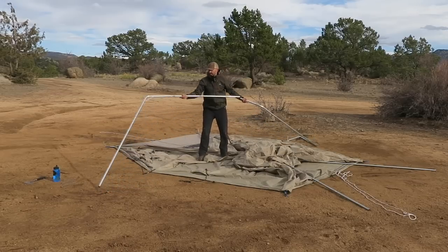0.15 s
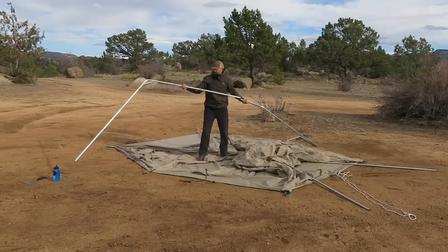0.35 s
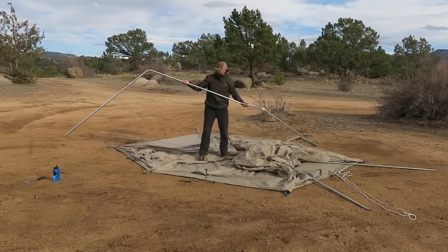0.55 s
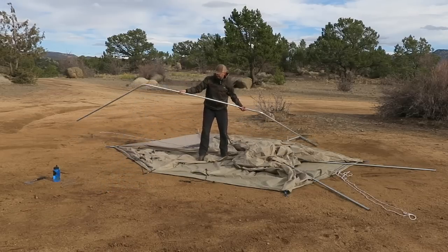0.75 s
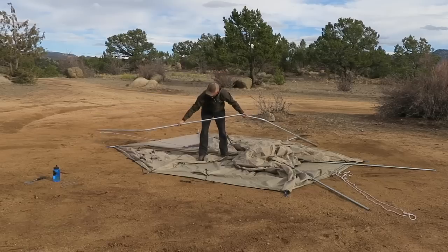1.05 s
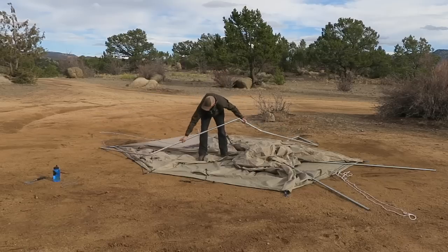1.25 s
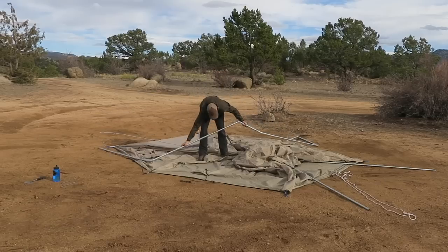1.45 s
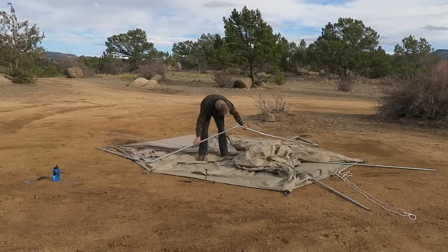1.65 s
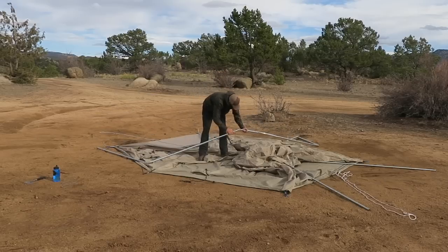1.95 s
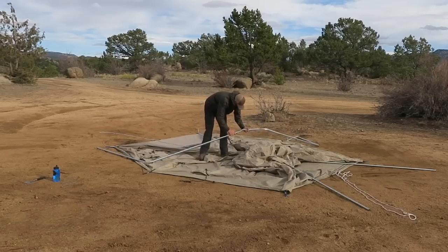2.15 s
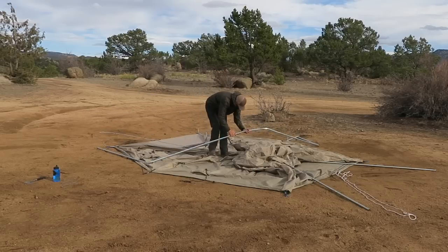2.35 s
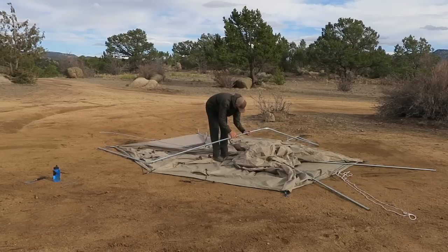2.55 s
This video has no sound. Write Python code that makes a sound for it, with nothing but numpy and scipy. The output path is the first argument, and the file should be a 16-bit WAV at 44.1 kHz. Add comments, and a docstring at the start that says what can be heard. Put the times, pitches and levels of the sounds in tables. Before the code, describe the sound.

Metal tent poles rattle lightly at a loose joint, go nearly quiet, then strike with one sharp knock and settle with small clinks and scrapes over fabric, while wind thumps low on the stereo microphones outdoors.

```python
"""Open ground outdoors: metal tent poles are swung, laid down on tent fabric and shifted about.
Each contact is gritty noise shaped as thud, body and treble; it sets tube modes, a loose joint
or a short clink ringing faintly, and one sharp knock stands out. The poles sit a little left.
Wind rumbles (shaped noise) and buffets (short low pulses) on the microphones over a quiet hush."""
import sys
import numpy as np
from scipy import signal
from scipy.fft import rfft, irfft, next_fast_len
from scipy.io import wavfile

SR = 44100
rng = np.random.default_rng(int(sys.argv[2]) if len(sys.argv) > 2 else 0)


def wrap_up_sound(samples):
    """Save the sound to the file named by the first command line argument, as 16-bit audio."""
    columns = np.atleast_2d(samples).T
    # keep every value between -1 and 1, then stretch to whole-number steps
    tamed = np.clip(columns, -1, 1)
    steps = np.round(tamed * 32767).astype(np.int16)
    wavfile.write(sys.argv[1], SR, steps)


N = 119070

# Outdoor hush with fabric rustle, level over time: start_s [s], level_db [dB]
RUSTLE_LEVEL = [(0.0, -55), (1.02, -57), (1.53, -54), (2.13, -56.5), (2.52, -48.5), (2.7, -52)]
# Spectrum of the hush: pitch_hz [Hz], level_db [dB per Hz]
HUSH_SPECTRUM = [(100, -11), (230, -9.5), (680, -17.5), (1550, -24), (4000, -29.5), (7400, -37),
                 (11000, -41.5), (13000, -44)]
# Likeness of left and right in the hush: pitch_hz [Hz], likeness [0 to 1]
STEREO_LIKENESS = [(60, 1), (240, 0.66), (950, 0)]

# Wind strength over time: start_s [s], level_db [dB]
GUST_LEVEL = [(0.0, -60), (0.73, -53), (0.96, -50.5), (1.14, -52.5), (1.39, -44.5), (1.71, -47),
              (2.0, -36.5), (2.12, -34), (2.27, -37.5), (2.38, -34.5), (2.52, -42), (2.7, -56)]
# Spectrum of the wind rumble: pitch_hz [Hz], level_db [dB per Hz]
WIND_SPECTRUM = [(25, -1.5), (43, 6.5), (63, 0), (97, -2.5), (162, -20), (300, -27)]
# Single wind buffets: peak_s [s], level_db [dB at peak], pitch_hz [Hz], width_s [s],
# left_over_right_db [dB], push [+1 push, -1 pull]
WIND_BUFFETS = [(.19, -41.5, 43.6, 0.012, 1.5, 1), (0.828, -37, 48.6, 0.016, -1, 1),
                (1.177, -32, 58.6, 0.0055, 5, 1), (1.259, -29, 65, 0.0052, 3.5, -1),
                (1.313, -22, 177, 0.0032, -1, 1), (1.694, -30, 49.7, 0.0059, 1.5, -1),
                (2.037, -21.5, 135, 0.0031, -13.5, 1), (2.053, -25, 98, .008, 4, 1),
                (2.0376, -36, 293, 0.0015, -14, 1), (2.124, -29, 58, 0.017, -2, -1),
                (2.191, -32, 87.3, 0.027, -10, 1), (2.228, -15, 61.3, 0.0099, 3, -1),
                (2.239, -17, 137.4, 0.0041, -10, 1), (2.332, -24, 67, 0.006, -4, -1),
                (2.434, -21.5, 103, 0.0024, -10, 1), (2.472, -33, 56, 0.044, -5, -1)]
WIND_OWN_DB = -9.5   # the part that differs between the microphones, against the shared part

# Pole contacts: peak_s [s], level_db [dB], thud_db [dB re level], treble_db [dB re level],
# ring_db [dB re level], rise_s [s for 20 dB], t60_s [s], clink_hz [Hz]
POLE_CONTACTS = [(0.04, -52, -36, -2, -9.5, .008, 0.12, 2860), (0.127, -50, -35, 7, -3, .004, 0.094, 2400),
                 (0.16, -33.5, -9.5, -3, -24, .005, 0.086, 3950),
                 (0.178, -36.5, -27, -4, -9, .03, 0.08, 1820), (0.198, -47, 0, -4, -19, .015, 0.11, 2720),
                 (0.248, -42, -11.5, -9, -23, .006, 0.14, 3810),
                 (0.313, -52, -4.5, -6, -18, .006, 0.18, 1755), (0.335, -54, -7, -7, -14, .02, 0.18, 2940),
                 (0.368, -51, 9.5, -30, -20, .0007, 0.022, 1760),
                 (0.585, -50, 2.5, -16, -9, .003, 0.084, 2820),
                 (0.637, -51.5, -16, -4, -17, .02, 0.16, 2260),
                 (0.704, -59, -22, -5, -7.5, .008, 0.22, 4770),
                 (0.758, -51.5, 1, -15, -26, .004, 0.052, 2690),
                 (0.853, -56, -1.5, -26, -22, .001, 0.076, 1820),
                 (0.89, -53.5, 0.5, -6.5, -22, .025, 0.11, 2530),
                 (0.907, -50, 8.5, -12, -24, .015, 0.06, 3020),
                 (1.306, -22, -9.5, -2.5, -41, .003, 0.082, 4610),
                 (1.315, -22, -4.5, -14, -11, .004, 0.032, 2550),
                 (1.325, -34, -1, -1, -7.5, .008, 0.24, 3940), (1.362, -28, -9, -9, -37, .005, 0.057, 2510),
                 (1.384, -45.5, 4, 2, -25, .01, 0.1, 4060), (1.411, -41.5, -1.5, 3, -8, .005, 0.15, 4900),
                 (1.424, -42.5, -16, -5, 3, .01, 0.048, 4720),
                 (1.438, -47.5, 12.5, -12, -22, .005, 0.03, 1750),
                 (1.471, -53, 4.5, -4, -25, .005, 0.19, 4200),
                 (1.499, -42, -3.5, -2, -16.5, .002, 0.085, 4150),
                 (1.707, -52, 5.5, -6, -8, .002, 0.078, 2600), (1.75, -54, 3.5, 1.5, -5, .003, 0.11, 3000),
                 (1.772, -55.5, 5.5, 1.5, -8.5, .012, 0.18, 3130),
                 (1.83, -55.5, -17, 1, -25, .003, 0.18, 3280),
                 (1.84, -43.5, -2, -2.5, -9, .004, 0.057, 4740),
                 (1.985, -67, -3, 9.5, 2.5, .004, 0.14, 5400), (2.058, -58, -6, -13, -3, .004, 0.15, 4620),
                 (2.104, -53.5, 2, -11.5, -26, .04, 0.38, 2665),
                 (2.134, -39, -15, -8.5, -26, .0015, 0.066, 4730),
                 (2.14, -41.5, -2, -20, -12.5, .004, 0.032, 2670),
                 (2.237, -56, 3, -10, -4, .005, 0.071, 4830),
                 (2.268, -49.5, 3.5, -29, -16, .012, 0.084, 2700),
                 (2.358, -45, 0, -29, -11.5, .002, 0.15, 2470),
                 (2.369, -43, -5.5, -29, -26, .012, 0.043, 2530), (2.42, -54, 3, -25, -23, .002, .03, 2720),
                 (2.443, -49, 3, -3, -12.5, .004, 0.089, 4560), (2.46, -52, 9, -12, -17, .001, 0.042, 1000),
                 (2.48, -48, 6.5, -24, -34, .015, 0.27, 1200), (2.511, -73, 12, -11, -7, .015, 0.067, 1900),
                 (2.598, -40.5, 0.5, -4, -19, .0015, 0.076, 4800),
                 (2.639, -45, 1, -6.5, -15, .015, 0.16, 3480), (2.654, -51.5, 7, -5, -14, .01, 0.081, 2680)]
# Spectra of the three scrape layers: pitch_hz [Hz], level_db [dB per Hz]
THUD_SPECTRUM = [(120, -3.5), (400, -3), (620, 4), (1500, -5.5)]
BODY_SPECTRUM = [(1400, 10), (2500, 16.5), (3500, 10.5), (4700, 10), (6200, 5)]
TREBLE_SPECTRUM = [(5800, 7), (7100, 5.5), (10200, 5), (12000, 6.5), (13800, 1), (14800, -31)]
GRIT_PER_S, GRIT_SPREAD_DB, GRIT_SHARE = 3500, 6, 0.45   # impacts per second, size spread, share of the mix
CLUMP_DB, CLUMP_HZ = 1.8, 260   # the grit comes in clumps
TICK_S = .008   # a contact with this rise adds a tick as strong as the grit; faster ones tick harder

CLINK_DB, CLINK_T60_S = -23, 0.036
# Modes of the joint that rattles while the pole is swung up: pitch_hz [Hz], level_db [dB]
JOINT_MODES = [(1770, -15), (2590, -21), (3170, -14.5), (3730, -14.5), (4230, -14.5), (6090, -20),
               (12400, -22)]
JOINT_T60_S, SWING_END_S = .055, .4
# Ringing modes of the tubes: pitch_hz [Hz], level_db [dB], t60_s [s]
TUBE_MODES = [(785, -9, .14), (590, -7, .08), (1890, -11, .16), (4270, -12, .15), (2400, -16, .12),
              (2620, -16, .1), (4040, -16, .34), (4742, -7, .45), (5140, -12, .1), (5600, -16, .1),
              (7650, -18, .1), (8920, -18, .1), (11400, -14, .09), (13140, -19, .12)]
RING_DB, STRIKE_SPREAD_DB = -18.5, 2.0
TWIN_RATIO = .991   # a tube is never quite round: each mode has a close twin
FLUTTER_DB, FLUTTER_HZ = 2.5, 35   # the ringing flutters as the held tubes wobble

RIGHT_LAG_SAMPLES, POLE_PAN_DB = .75, 0.5   # pan is left over right
SCATTER_DB = -17.5
CUTOFF_HZ = 16450


def amp(db):
    """dB to gain."""
    return 10 ** (np.asarray(db) / 20)


def rms_one(x):
    """Scale to rms 1."""
    return x / np.sqrt(np.mean(x ** 2) + 1e-20)


def in_time(rows):
    """A curve read at every sample."""
    s, value = np.transpose(rows)
    return np.interp(np.arange(N) / SR, s, value)


def at_hz(points, hz):
    """A spectrum read on a log-frequency axis."""
    point_hz, value = np.transpose(points)
    return np.interp(np.log(hz), np.log(np.maximum(point_hz, 1)), value)


def coloured(x, spectrum):
    """Shape a signal by a spectrum with steep ends; minimum phase, so nothing sounds early; rms 1."""
    size = next_fast_len(N)
    hz = np.maximum(np.arange(size // 2 + 1) * SR / size, 1)
    octaves_below = np.maximum(np.log2(spectrum[0][0] / hz), 0)
    octaves_above = np.maximum(np.log2(hz / spectrum[-1][0]), 0)
    # 36 dB per octave beyond the listed ends, for two octaves
    level_db = at_hz(spectrum, hz) - 36 * np.minimum(octaves_below + octaves_above, 2)
    # folding the cepstrum forward gives the minimum phase
    cepstrum = irfft(level_db * np.log(10) / 20, size)
    cepstrum[1:size // 2] *= 2
    cepstrum[size // 2 + 1:] = 0
    response = np.exp(rfft(cepstrum))
    return rms_one(irfft(rfft(x, size) * response, size)[..., :N])


def drift(rate):
    """Random wander of spread 1, low-passed near rate in Hz and computed every 40 samples."""
    r = np.exp(-80 * np.pi * rate / SR)
    noise = rng.standard_normal(N // 40 + 2002)
    slow = signal.lfilter([1], [1, -2 * r, r * r], noise)[2000:]   # drop the filter's start-up
    return np.interp(np.arange(N) / 40, np.arange(len(slow)), rms_one(slow))


def ring(drive, hz, t60):
    """A two-pole resonator: a unit click sets a decaying sine of height 1 ringing."""
    r = amp(-60 / (max(t60, .01) * SR))
    w = 2 * np.pi * hz / SR
    return signal.lfilter([0, np.sin(w)], [1, -2 * r * np.cos(w), r * r], drive + 1e-18)


def hush():
    """Half-octave bands of stereo noise, each flickering, more alike left and right in the bass."""
    out = 0
    edges = 100 * 2 ** np.arange(0, 7.6, .5)
    white = rng.standard_normal((2, 2, N))
    for k, (low, high) in enumerate(zip(edges, edges[1:])):
        band = signal.butter(2, [low, high], "band", fs=SR, output="sos")
        mid, side = signal.sosfilt(band, white[k % 2])
        alike = np.clip(at_hz(STEREO_LIKENESS, np.sqrt(low * high)), 0, 1)
        stereo = np.sqrt(1 + alike) * mid + np.sqrt(1 - alike) * side * [[1], [-1]]
        out = out + amp(3.1 * drift(17.8)) * stereo
    shaped = coloured(out, HUSH_SPECTRUM)
    # the level is set by what lies above 500 Hz
    above = signal.sosfilt(signal.butter(4, 500, "high", fs=SR, output="sos"), shaped)
    return amp(in_time(RUSTLE_LEVEL)) * shaped / np.std(above)


def wind():
    """Lumpy low noise, mostly shared by both microphones, plus the single buffets."""
    shared, own = coloured(rng.standard_normal((2, N)), WIND_SPECTRUM)
    own = signal.sosfilt(signal.butter(2, 70, "high", fs=SR, output="sos"), own)
    strength = amp(in_time(GUST_LEVEL) + 2.5 * drift(6))
    rumble = strength * (shared + amp(WIND_OWN_DB) * own * [[1], [-1]])
    return rumble + buffets()


def buffets():
    """Each buffet is a low cosine under a bell-shaped swell, pushing or pulling at its peak."""
    out = np.zeros((2, N))
    t = np.arange(N) / SR
    for s, db, hz, width, pan_db, push in WIND_BUFFETS:
        swell = amp(db) * np.exp(-.5 * ((t - s) / width) ** 2)
        puff = np.sign(push) * swell * np.cos(2 * np.pi * hz * (t - s))
        out = out + puff * amp([[pan_db / 2], [-pan_db / 2]])
    return out


def grit():
    """Uneven micro-impacts over a bed of noise, in clumps, with one tick at each contact's peak."""
    sizes = amp(GRIT_SPREAD_DB * np.minimum(rng.exponential(1, N), 2.5)) * rng.choice([-1, 1], N)
    impacts = rms_one(sizes * (rng.random(N) < GRIT_PER_S / SR))
    out = GRIT_SHARE * impacts + (1 - GRIT_SHARE) * rng.standard_normal(N)
    out = rms_one(out * amp(CLUMP_DB * drift(CLUMP_HZ)))
    s, *_, rise, _, _ = np.transpose(POLE_CONTACTS)
    out[(s * SR).astype(int)] += TICK_S / rise
    return out


def envelopes():
    """First sample and rise-and-decay shape of each contact, straight lines in dB."""
    for s, *_, rise, t60, _ in POLE_CONTACTS:
        t = np.arange(-2 * rise, t60, 1 / SR)
        i = int((s - 2 * rise) * SR)
        shape_db = np.where(t < 0, 20 * t / rise, -60 * t / t60)
        yield i, amp(shape_db)[:N - i]


def swells(db):
    """Power sum of all contact envelopes at the given levels."""
    power = np.zeros(N)
    for (i, shape), level in zip(envelopes(), db):
        power[i:i + len(shape)] += (amp(level) * shape) ** 2
    return np.sqrt(power)


def scrapes(g):
    """Thud, body and treble of the grit under each contact's envelope."""
    _, db, thud_db, treble_db, *_ = np.transpose(POLE_CONTACTS)
    layers = ((THUD_SPECTRUM, db + thud_db), (BODY_SPECTRUM, db), (TREBLE_SPECTRUM, db + treble_db))
    return sum(coloured(g, colour) * swells(level) for colour, level in layers)


def clinks(g):
    """The joint that touches gives a short ring at a pitch of its own."""
    out = np.zeros(N)
    for (i, shape), (_, db, *_, hz) in zip(envelopes(), POLE_CONTACTS):
        drive = g[i:i + len(shape)] * shape * amp(db + CLINK_DB)
        out[i:i + len(shape)] += ring(drive, hz, CLINK_T60_S)
    return out


def loose_joint(g):
    """While the pole is swung up, the grit rings the modes of its loose joint."""
    _, db, _, _, ring_db, *_ = np.transpose(POLE_CONTACTS)
    swung = np.arange(N) < SWING_END_S * SR
    return sum(ring(g * swung * swells(db + ring_db + mode_db), hz, JOINT_T60_S)
               for hz, mode_db in JOINT_MODES)


def tubes(g):
    """After the swing, each contact's grit drives every pair of tube modes with its own strength."""
    _, db, _, _, ring_db, *_ = np.transpose(POLE_CONTACTS)
    spread = STRIKE_SPREAD_DB * rng.standard_normal((len(db), len(TUBE_MODES)))
    after_swing = np.arange(N) >= SWING_END_S * SR
    out = np.zeros(N)
    for k, (hz, mode_db, t60) in enumerate(TUBE_MODES):
        drive = g * after_swing * swells(db + ring_db + RING_DB + mode_db + spread[:, k])
        pair = ring(drive, hz, t60) + .5 * ring(drive, hz * TWIN_RATIO, t60 / 2)
        out += pair * amp(FLUTTER_DB * drift(FLUTTER_HZ)) * (-1) ** k   # modes alternate in sign
    return out


def scattered_treble():
    """Scrapes of fresh noise, tilted to the treble and opposite left and right, off the fabric."""
    return np.diff(scrapes(rng.standard_normal(N)), prepend=0) * [[1], [-1]]


def scene():
    """Poles a little left of centre, with treble scattered off the fabric, over hush and wind."""
    g = grit()
    poles = scrapes(g) + clinks(g) + loose_joint(g) + tubes(g)
    # a delay of part of a sample, made by turning the phase
    lag = np.exp(-2j * np.pi * RIGHT_LAG_SAMPLES * np.arange(N // 2 + 1) / N)
    late = irfft(rfft(poles) * lag, N)
    direct = np.stack([poles, late]) * amp([[POLE_PAN_DB / 2], [-POLE_PAN_DB / 2]])
    return hush() + wind() + direct + amp(SCATTER_DB) * scattered_treble()


def record(dry):
    """The top is cut steeply by a low-pass filter."""
    return signal.sosfilt(signal.cheby2(12, 70, CUTOFF_HZ, fs=SR, output="sos"), dry)


dry = scene()
out = record(dry)
wrap_up_sound(out)
```